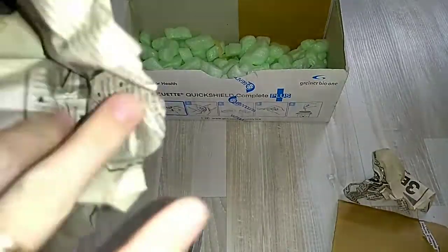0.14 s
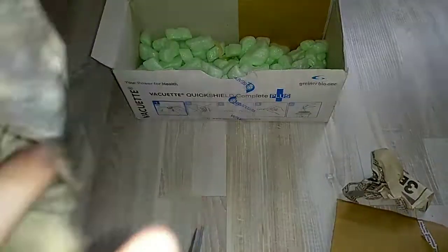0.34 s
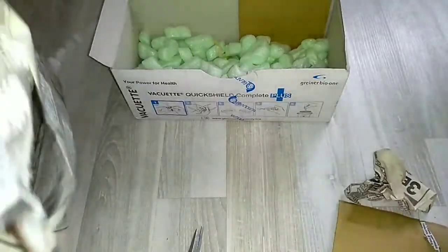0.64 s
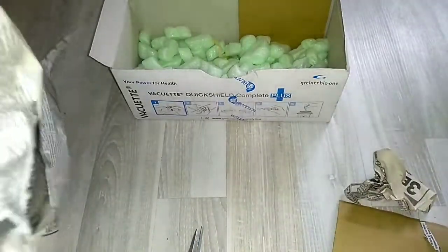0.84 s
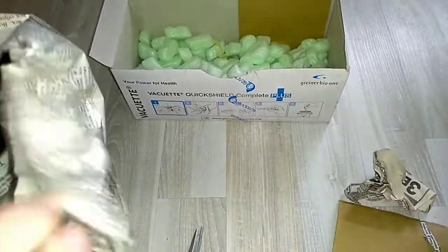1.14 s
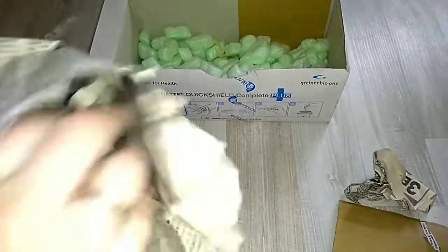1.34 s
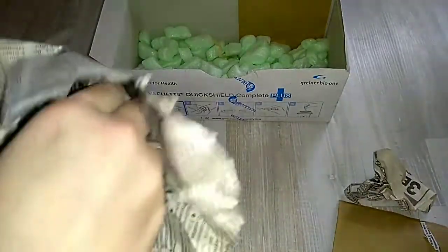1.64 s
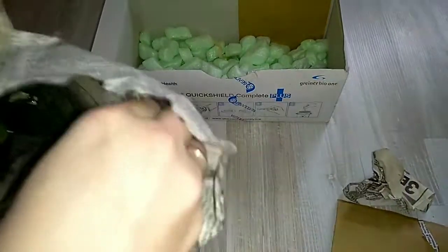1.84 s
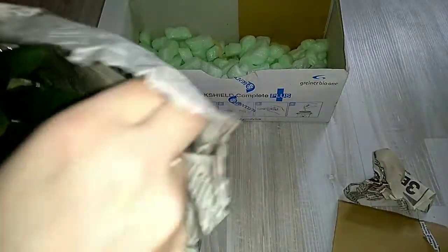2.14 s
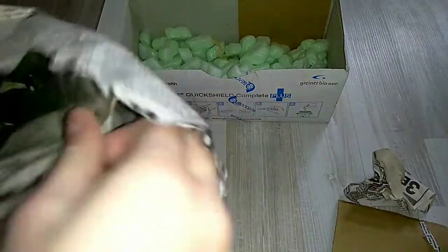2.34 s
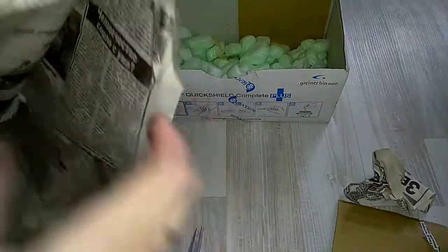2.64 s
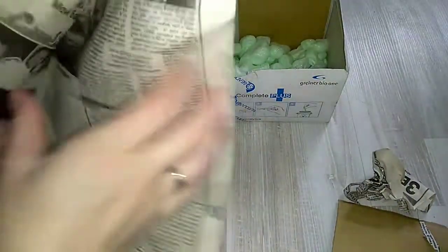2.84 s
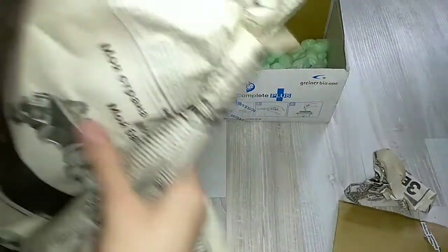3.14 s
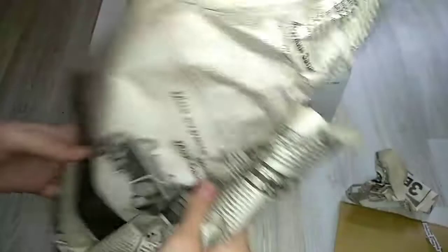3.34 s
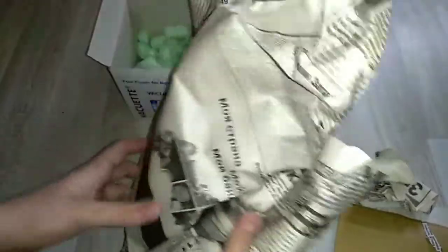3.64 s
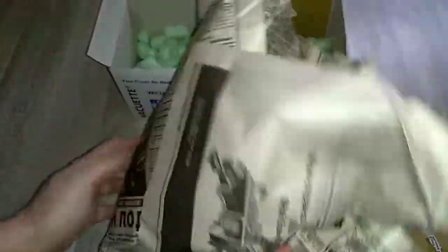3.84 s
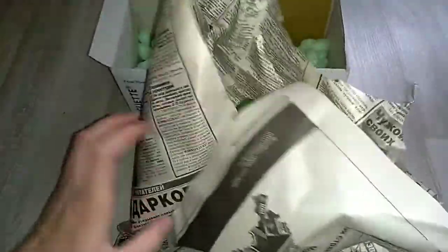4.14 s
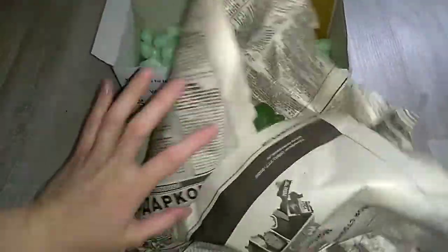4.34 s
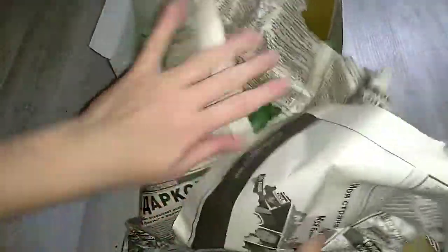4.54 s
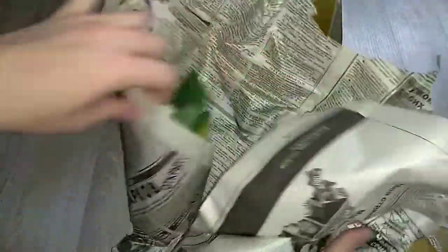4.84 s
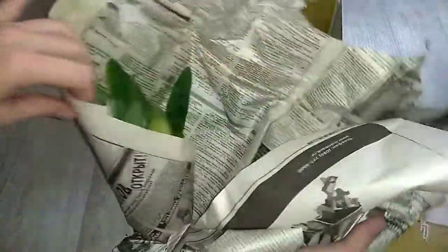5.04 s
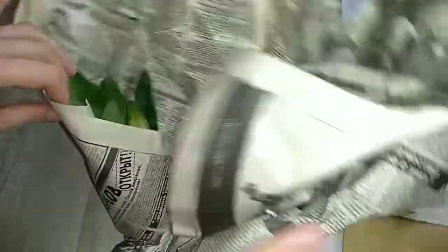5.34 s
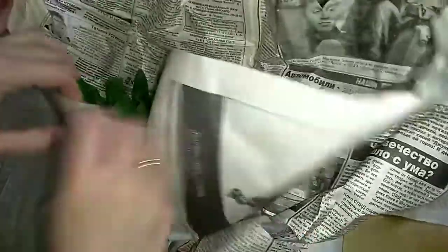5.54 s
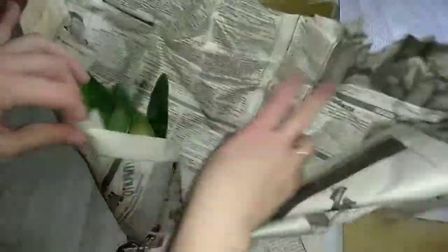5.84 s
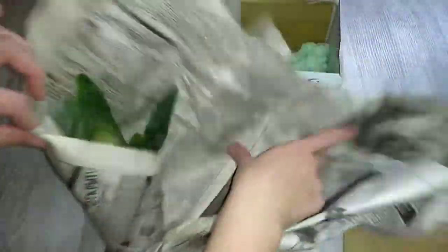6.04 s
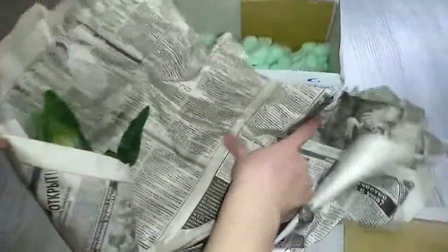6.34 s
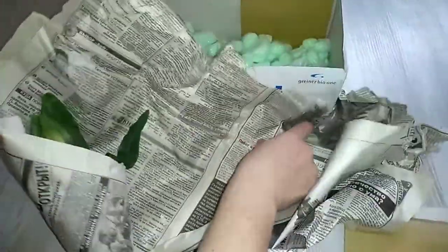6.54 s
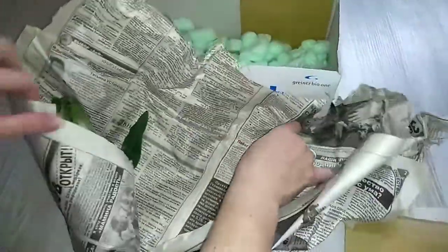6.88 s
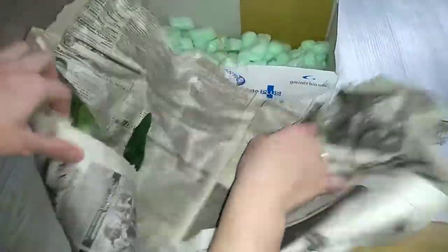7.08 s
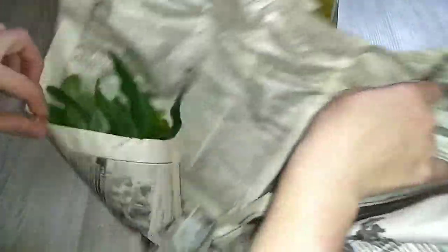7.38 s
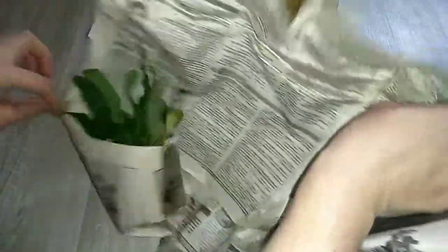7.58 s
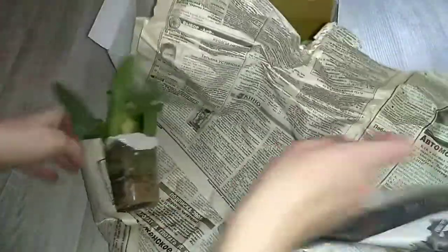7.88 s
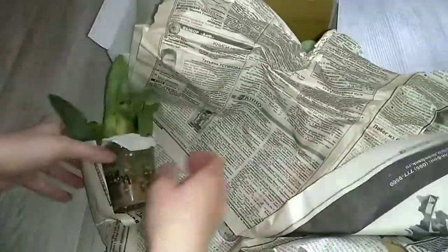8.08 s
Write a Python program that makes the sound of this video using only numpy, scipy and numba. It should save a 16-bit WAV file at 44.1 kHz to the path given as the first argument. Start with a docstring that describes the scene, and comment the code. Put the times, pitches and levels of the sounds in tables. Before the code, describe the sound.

Hands unwrap a potted plant from newspaper, heard close up in stereo indoors. Crisp crackling and loud crease snaps begin at once, pause briefly, then return stronger with flapping air and hollow paper pops. A sparser, quieter passage follows, then long vigorous rustling. Near the end two low muffled knocks come close together as the pot rocks on the floor. The room tail is short and faint.

```python
"""A small quiet room: two hands pull crumpled newspaper open just under a phone with two microphones.
Creases buckle as short bursts of noise through a resonance: thousands of faint ones crinkle and pop hollow
patches, while louder ones, placed one by one, snap and may ring a free patch of the sheet. Paper slides on
paper as a steady hiss, and flaps shove low puffs of air at the microphones. Near the end the unwrapped pot
tips onto the floor and rocks: two deep thuds. A short diffuse tail and a faint hush are the room."""
import sys
import numpy as np
from scipy import signal
from scipy.fft import rfft, irfft, next_fast_len
from scipy.io import wavfile
from scipy.ndimage import uniform_filter1d
from numba import njit

SR = 44100
rng = np.random.default_rng(int(sys.argv[2]) if len(sys.argv) > 2 else 0)


def unload_audio(sound):
    """Save the sound as a 16-bit wav file, at the path given as the first command line argument."""
    columns = np.transpose(np.atleast_2d(sound))
    # keep every value between -1 and 1, then stretch to whole-number steps
    steps = np.round(np.clip(columns, -1, 1) * 32767)
    wavfile.write(sys.argv[1], SR, steps.astype(np.int16))


def decibels_to_gain(level_db):
    """Convert a level in decibels to a linear amplitude gain (20 dB per decade)."""
    exponent = np.asarray(level_db, float) / 20
    return 10 ** exponent


N = 362073
TIME = np.arange(N) / SR  # s

# colour of a crack at the microphones, drawn on by the share that colour() takes: pitch_hz, level_db
CRACK_COLOUR = [(1200, -21), (2000, -14), (2430, -11.5), (5000, -8.5), (9100, -1.5), (12400, -2.5),
                (14500, -7), (15500, -11.5)]


def unit(x):
    """Scale to rms 1."""
    return x / np.sqrt(np.mean(x ** 2))


def colour(x, points, share=0.7):
    """Filter by (Hz, dB) points joined along log frequency; share multiplies the dB."""
    hz, db = np.transpose(points)
    size = next_fast_len(N)
    log_hz = np.log(np.arange(size // 2 + 1) * SR / size + 1)
    gain = decibels_to_gain(share * np.interp(log_hz, np.log(hz + 1), db))
    return irfft(rfft(x, size) * gain, size)[..., :N]


def pair(pan_db):
    """Left and right gains for a left-minus-right difference in dB."""
    return decibels_to_gain(np.outer([.5, -.5], pan_db))


def airy():
    """Two-channel noise, shared in the bass and unrelated in the treble."""
    alike_hz = 1500  # left and right grow alike below this pitch
    shared, left, right = rng.standard_normal((3, N))
    low = signal.butter(1, alike_hz, "low", fs=SR)
    high = signal.butter(1, alike_hz, "high", fs=SR)
    return signal.lfilter(*low, shared) + signal.lfilter(*high, [left, right])


@njit
def bursts(noise, start, offset, hz, width, fade, gain, rise):
    """Each burst is noise that swells quickly, fades and drives its own resonance; its energy is set."""
    out = np.zeros(noise.shape)
    n = noise.shape[1]
    for e in range(len(start)):
        # band-pass state-variable filter: tuning and damping
        g, k = np.tan(np.pi * hz[e] / SR), width[e] / hz[e]
        length = int(4 * (fade[e] + SR / (np.pi * width[e])))
        length = min(length, n - offset[e], n - start[e])
        ring = np.zeros(length)
        for c in range(2):
            band, low, energy, rung = 0., 0., 0., 1e-18
            push, lack = 1., 1.  # fading drive, and what its onset still lacks
            for i in range(length):
                shape = push * (1 - lack)
                v = (band + g * (shape * noise[c, offset[e] + i] - low)) / (1 + g * (g + k))
                band = 2 * v - band
                low += 2 * g * v
                ring[i] = v
                energy += shape * shape
                rung += v * v
                push *= 1 - 1 / fade[e]
                lack *= 1 - 1 / (1 + rise * fade[e])
            # the ring gets the energy of its envelope, whatever the filter passed
            scale = gain[c, e] * np.sqrt(energy / rung)
            for i in range(length):
                out[c, start[e] + i] += scale * ring[i]
    return out


def buckle(noise, s, hz, q, fade_ms, gain, rise):
    """Bursts whose strength follows the gain whatever their pitch and width; rise is a share of the fade."""
    offset = rng.integers(0, N // 2, len(s))  # each burst starts at its own place in the noise
    fade = np.maximum(fade_ms * SR / 1000, 2.)
    return bursts(noise, (s * SR).astype(np.int64), offset, hz, hz / q, fade, gain, rise)


def swarm(noise, folds, low_hz, high_hz, q, fade_ms, spread_db, side_db):
    """Many buckles scattered in place and pitch; spread_db is the gain per unit of surprise."""
    s, surprise = folds
    pitch, side, length = rng.random((len(s), 3)).T
    hz = low_hz * (high_hz / low_hz) ** pitch
    gain = decibels_to_gain(spread_db * surprise) * pair(side_db * (2 * side - 1))
    return unit(buckle(noise, s, hz, q, fade_ms * (.5 + length), gain, rise=1.0))


def swells(s, db, build_s, dying_s):
    """Gain of overlapping gestures that build to a peak and die away; their powers add."""
    drop_db, roundness = 24, 1.41  # drop one build-up before or one dying time after a peak; its power law
    coarse = TIME[::64]
    t = coarse - s[:, None]
    span = np.where(t < 0, build_s[:, None], dying_s[:, None]).clip(.01)
    shape_db = -drop_db * np.abs(t / span) ** roundness
    power = decibels_to_gain(db[:, None] + shape_db) ** 2 + 1e-12
    return np.interp(TIME, coarse, np.sqrt(power.sum(axis=0)))


def hush():
    """The faint, bass-heavy noise floor of the room."""
    return decibels_to_gain(-73) * unit(colour(airy(), [(90, 17), (1500, -2), (15000, -4)]))


def room(x):
    """A short, dull, diffuse tail of decaying noise, different at each microphone, added to the sound."""
    t60_s, tail_db, dull_hz = .16, -13, 7000
    t = TIME[:SR // 4]
    fall = 1000 ** (-t / t60_s)
    onset = np.minimum(t / 0.00094, 1)
    tail = rng.standard_normal((2, len(t))) * fall * onset
    tail = signal.lfilter(*signal.butter(1, dull_hz, fs=SR), tail)
    tail = tail / np.sqrt(np.sum(tail ** 2, axis=1, keepdims=True))
    return x + decibels_to_gain(tail_db) * signal.fftconvolve(x, tail, axes=1)[:, :N]


def thuds():
    """The floor answers the tipping, rocking pot with short, deep booms, alike at both microphones."""
    # each knock of the pot: start_s, level_db, pitch_hz
    knocks = [(7.756, -31, 125), (7.825, -31, 62)]
    s, db, hz = np.transpose(knocks)
    rumble = unit(signal.lfilter(*signal.butter(1, 150, fs=SR), rng.standard_normal(N)))
    fade_ms = np.full(len(s), 34.)
    return buckle(np.array([rumble, rumble]), s, hz, 1.2, fade_ms, decibels_to_gain(db) * pair(0 * s), rise=0.12)


def puffs(worked):
    """Flaps shove air at the microphones in overlapping low thumps, as they swing and with every pull."""
    # each swing of a flap: peak_s, level_db, build_s, dying_s
    swings = [(0.14, -51.5, .03, 0.053), (0.48, -39, 0.15, 0.18), (0.8, -45, .1, .1),
              (1.17, -56, 0.072, 0.11), (1.53, -40, 0.21, 0.079), (1.89, -41.5, 0.089, 0.064),
              (2.06, -45, 0.1, 0.12), (2.24, -53, .1, .08), (2.43, -61, 0.092, 0.51),
              (2.84, -44.5, 0.026, 0.26), (3.16, -41.5, 0.17, 0.21), (3.63, -29.5, 0.051, 0.077),
              (5.78, -49, 0.15, 0.21), (6.12, -36.5, 0.13, 0.26), (6.71, -54, 0.65, 0.15),
              (7.34, -49, .04, 0.065), (7.555, -49, .03, .03), (7.86, -41, 0.14, .09)]
    stir_db = -37  # air moved by any pull, relative to its crinkle
    noise = rng.standard_normal(N) + .38 * rng.standard_normal((2, N))  # mostly shared
    flaps = np.sort(rng.random(1100)) * N / SR, rng.random(1100)
    thumps = swarm(noise, flaps, 45.0, 230.0, q=1.5, fade_ms=11., spread_db=5.0, side_db=2.5)
    thumps = signal.lfilter(*signal.butter(2, 290, fs=SR), thumps)
    air = np.hypot(swells(*np.transpose(swings)), decibels_to_gain(stir_db) * worked)
    return air * pair(-1.7) * thumps


def sheet_side():
    """Where the hands hold the sheet, as a left-minus-right level in dB at every sample."""
    # path of the sheet: time_s, left_minus_right_db
    path = [(0.0, 0), (4.62, 7), (7.96, 4), (8.21, 2.5)]
    s, pan_db = np.transpose(path)
    return np.interp(TIME, s, pan_db)


def pulls():
    """Gains of crinkle and hollow patches as the hands pull, pause and pull again."""
    # each pull: peak_s, crinkle_db, build_s, dying_s, hollow_db (relative to the crinkle)
    gestures = [(0.03, -43, 0.13, 0.43, -24), (0.19, -32.5, 0.13, 0.39, -4.5),
                (0.33, -30.5, 0.31, 0.26, -13.5), (0.48, -23.5, .13, 0.14, -6.5),
                (0.68, -30.5, 0.078, 0.12, -12), (0.859, -36, 0.087, 0.085, -4),
                (1.08, -45, 0.046, 0.066, -31), (1.161, -25.5, 0.072, 0.081, -14.5),
                (1.4, -26, .14, 0.73, -21), (1.66, -27, 0.48, 0.16, -5.5), (1.871, -20, 0.18, 0.082, -10),
                (2.06, -27.5, 0.17, 0.064, -2.5), (2.17, -32, 0.19, 0.27, -6), (2.53, -28, 0.62, 0.15, -13),
                (2.75, -55.5, 0.29, 0.072, -4.5), (2.848, -21, 0.036, 0.11, -16),
                (2.95, -31, .12, .22, -14), (3.082, -26, 0.047, 0.75, -6), (3.329, -22, 0.17, 0.075, -8),
                (3.47, -33.5, 0.41, 0.32, -19), (3.652, -18.5, 0.095, 0.086, -7),
                (3.83, -35, 0.054, 0.3, 2.5), (3.92, -23, 0.11, 0.36, -9), (4.2, -30, 0.11, 0.18, -9.5),
                (4.328, -29.5, 0.11, 0.24, -3.5), (4.63, -38, 0.047, 0.24, -6),
                (4.96, -29, 0.11, 0.18, -11.5), (5.169, -38, 0.16, 0.069, -9.5), (5.3, -49, 0.17, 0.29, -7),
                (5.41, -42.5, 0.093, 0.12, -8.5), (5.53, -55.5, .1, 0.13, -6), (5.7, -29, 0.03, 0.2, -22),
                (5.82, -22, 0.12, 0.13, -5), (6.18, -21, 0.3, 0.38, -9.5), (6.5, -25.5, 0.11, 0.35, -8),
                (6.64, -24.5, 0.13, 0.46, -15.5), (7.07, -31, 0.11, .2, -13),
                (7.332, -21.5, 0.32, .15, -12.5), (7.55, -28.5, 0.21, 0.5, -10.5),
                (7.808, -23, 0.095, 0.1, -14), (8.02, -58, .1, 0.21, -7)]
    s, db, build_s, dying_s, hollow_db = np.transpose(gestures)
    return swells(s, db, build_s, dying_s), swells(s, db + hollow_db, build_s, dying_s)


def creases(flurry_s, count):
    """Random buckles as (s, surprise): one crease sets off its neighbours, so they come in flurries."""
    which, wait, rarity = rng.random((count, 3)).T
    flurries = rng.random(count // 5) * N / SR
    s = flurries[(which * len(flurries)).astype(int)] - flurry_s * np.log(1 - wait)
    return s % (N / SR), -np.log(1 - .97 * rarity)  # most surprises are small, a few large


def hollows(noise, folds):
    """Buckles pop the patches between creases, each briefly at its own pitch."""
    # weight of the patch pitches, drawn on by the share that colour() takes: pitch_hz, level_db
    patch_colour = [(150, -26), (250, -8), (448, -15.5), (809, -3.5), (1860, -3.5), (3000, 7.5), (3900, 7),
                    (6600, -120)]
    pops = swarm(noise, folds, 347.0, 2400.0, q=3.13, fade_ms=2.63, spread_db=1.0, side_db=4.0)
    return unit(colour(pops, patch_colour))


def crinkle(noise, folds):
    """Dense bright cracks with the hiss of paper sliding on paper."""
    cracks = swarm(noise, folds, 2840.0, 12900.0, q=1.8, fade_ms=1.0, spread_db=2.8, side_db=9.5)
    hiss = decibels_to_gain(2.5) * unit(noise)
    return unit(colour(cracks + hiss, CRACK_COLOUR))


def muffle(x, hollowness):
    """Treble falls as the sheet billows into hollow folds, and its level wavers slowly at random."""
    dull_hz, plain_db = 10000, -11  # treble corner; hollowness that leaves the top plain
    dull_db_per_db = -0.35  # treble change per dB of hollowness
    waver_db, waver_s = 3.5, .06  # rms of the wavering; length of each smoothing
    span = int(waver_s * SR)
    drift = uniform_filter1d(uniform_filter1d(rng.standard_normal(N), span), span)
    waver = decibels_to_gain(waver_db * (unit(drift) - .5))
    low = signal.filtfilt(*signal.butter(2, dull_hz, fs=SR), x)
    dulling = (hollowness / decibels_to_gain(plain_db)) ** dull_db_per_db
    return low + (x - low) * dulling * waver


def snaps(noise, pan_db):
    """A loud crease cracks broadly and slaps the sheet round it; a free patch beside it rings along."""
    # single creases: start_s, crack_db, and where a free patch rings: patch_hz, patch_db (relative to crack_db)
    loud_creases = [(0.1802, 4), (0.273, -3, 2550, -16.5), (0.2849, -3), (0.378, -15), (0.414, -4.5),
                    (0.4275, 2, 2370, -19), (0.4527, 1, 342, -26.5), (0.4659, 1), (0.4863, 1),
                    (0.5312, 1.5, 566, -18), (0.545, -5), (0.6493, -9, 2520, -16), (0.6884, -7.5),
                    (0.7052, -7.5), (0.7735, -3), (0.7998, -1.5, 800, -24.5), (0.8243, -5.5, 855, -21),
                    (1.0668, -19, 1600, -21.5), (1.3152, -13, 2390, -16), (1.322, -12), (1.481, -4),
                    (1.551, 1.5), (1.5595, -9), (1.5772, -7, 2460, -13), (1.6164, -19.5, 2270, 7.5),
                    (1.646, -11, 2040, -9), (1.6965, -11, 605, -11), (1.72, -2.5, 1780, -24), (1.7534, -12),
                    (1.7742, -2.5), (1.808, -7.5, 2250, -11), (1.8379, -2, 776, -24),
                    (1.8869, -0.5, 2200, -15), (1.95, -10, 1140, -18), (1.9807, -10.5, 2550, -11.5),
                    (2.0403, 1, 450, -18), (2.064, -19, 470, 3), (2.1051, -2), (2.141, -5.5, 2410, -12.5),
                    (2.196, -9.5, 2460, -13), (2.209, -13, 1500, -21), (2.288, -7, 2580, -15.5),
                    (2.4065, -16), (2.8126, -11), (2.8295, 1.5, 1050, -20.5), (2.8446, 5, 1180, -22.5),
                    (2.8752, -1.5, 1560, -21), (2.948, -7.5, 2350, -20), (3.04, -14, 1330, -16),
                    (3.26, -8, 545, -17), (3.2855, -8, 850, -17), (3.3205, -3), (3.3823, -11),
                    (3.41, -15, 660, -12), (3.4267, -5), (3.489, -14.5), (3.616, -30.5, 775, 8.5),
                    (3.63, -1.5, 1174, -18), (3.6548, -1, 620, -21.5), (3.804, -7, 408, -12),
                    (3.8406, -11.5, 1680, -2), (3.8534, -10, 720, -18), (3.8695, -7, 680, -17),
                    (3.886, -14.5, 2060, -1), (3.9016, 2.5, 2190, -21), (3.9185, -9.5),
                    (3.9866, -5.5, 685, -13), (4.049, -10), (4.0742, -12), (4.1854, -12, 810, -11),
                    (4.1993, -5.5, 1700, -14.5), (4.2391, -4, 740, -16), (4.316, -4.5, 2270, -6.5),
                    (4.377, -22, 1770, -3), (4.134, -12.5, 800, -14), (4.495, -31.5, 764, 5),
                    (4.602, -16.5, 2730, -19), (4.6205, -11, 775, -6), (4.638, -20, 790, -9),
                    (4.681, -16, 2400, -14), (4.745, -27, 2210, -1.5), (4.8092, -35, 2400, 8),
                    (4.9471, -18, 910, -1.5), (5.151, -11.5, 910, -22), (5.3842, -28.5, 2580, -1),
                    (5.4162, -39.5, 840, 9.5), (5.5144, -23), (5.678, -15), (5.7244, -10),
                    (5.7825, 3.5, 660, -13), (5.7978, -4, 1500, -8.5), (5.8189, 4.5, 920, -26.5),
                    (5.938, -12), (6.0225, 2.5, 700, -19), (6.0668, -3.5), (6.0966, -8), (6.1121, -10),
                    (6.154, -5), (6.189, -3, 1600, -13.5), (6.346, -9), (6.43, -12), (6.451, -14),
                    (6.4822, -7, 1610, -14), (6.4907, -9, 1800, -4), (6.572, -25, 2460, 9), (6.62, 0),
                    (6.6255, -2), (6.6405, -6), (6.6529, -8), (6.7267, -5), (6.8447, -2, 2380, -16.5),
                    (6.9425, -5.5, 1840, -18.5), (7.0606, -11, 2860, -8), (7.1014, -9), (7.238, -9),
                    (7.268, -9), (7.3937, -9), (7.455, -8, 780, -16), (7.523, -18, 755, -0.5),
                    (7.5354, -12.5, 1400, -5.5), (7.55, -10, 2500, -16), (7.63, -11.5, 2400, -24),
                    (7.677, -13, 900, -20), (7.7237, -15.5, 1920, -4.5), (7.7584, -3.5),
                    (7.766, -2.5, 2930, -19.5), (7.7946, -7), (7.814, -7), (7.9122, -15), (7.986, -21.5)]
    slap_db = -19  # dull slap, relative to its crack
    s, db = np.transpose([row[:2] for row in loud_creases])
    pitch, length, side, breadth = rng.random((len(s), 4)).T
    side_db = pan_db[(s * SR).astype(int)] + 6 * (side - .5)
    fade_ms = 1 + 1.6 * length
    force = decibels_to_gain(db) / np.sqrt(fade_ms)  # a longer crease spreads the same energy
    crack_gain = force * pair(side_db)
    crack = buckle(noise, s, 7500 + 3000 * pitch, 0.6 + 0.6 * breadth, fade_ms, crack_gain, rise=0.25)
    slap_gain = force * decibels_to_gain(slap_db) * pair(0.4 * side_db)
    slap = buckle(noise, s, 900 * 4.0 ** pitch, 0.55, 1.3 * fade_ms, slap_gain, rise=0.25)

    s, db, hz, patch_db = np.transpose([row for row in loud_creases if len(row) > 2])
    patch_gain = decibels_to_gain(db + patch_db) * pair(0.28 * pan_db[(s * SR).astype(int)])
    patch = buckle(noise, s, hz, 4.5, np.full(len(s), 3.0), patch_gain, rise=0.3)
    return colour(crack, CRACK_COLOUR) + slap + patch


def reach(x, pan_db):
    """The left microphone hears the sheet later the further right it is held."""
    centred_db, lag_us_per_db = 6.5, 51.5  # side heard by both together; delay of the left per dB
    late = np.round((centred_db - pan_db) * lag_us_per_db * SR / 1e6).astype(int)
    left = x[0][(np.arange(N) - late).clip(0, N - 1)]
    return np.array([left, x[1]])


def scene():
    """The worked sheet in its room, the air it moves, the pot on the floor, and the faint hush."""
    worked, hollow = pulls()
    pan_db = sheet_side()
    noise, folds = unit(airy()), creases(.012, count=4000)
    bright = worked * pair(pan_db) * muffle(crinkle(noise, folds), hollow / worked)
    popping = hollow * pair(0.31 * pan_db) * hollows(noise, folds)
    sheet = reach(bright + popping + snaps(noise, pan_db), pan_db)
    return room(sheet) + puffs(worked) + thuds() + hush()


def roll_off(x):
    """The treble ends steeply here."""
    return signal.sosfilt(signal.butter(12, 16470, fs=SR, output="sos"), x)


def record(dry):
    """Each microphone has its own colour; deep bass and extreme top are cut, and peaks clip at full scale."""
    # colour difference of the microphones, of which each takes its own share: pitch_hz, left_minus_right_db
    lean = [(60, -3), (110, -3), (700, -5), (2380, -5.5), (4400, -11), (8120, -14), (15000, -4.5)]
    ports = np.array([colour(dry[0], lean, 0.098), colour(dry[1], lean, -0.57)])
    ports = signal.sosfilt(signal.butter(3, 52, "high", fs=SR, output="sos"), ports)
    ports = signal.sosfilt(signal.ellip(8, .3, 60, 15500, fs=SR, output="sos"), ports)
    return roll_off(np.clip(ports, -1, 1))


dry = scene()
out = record(dry)
unload_audio(out)
```